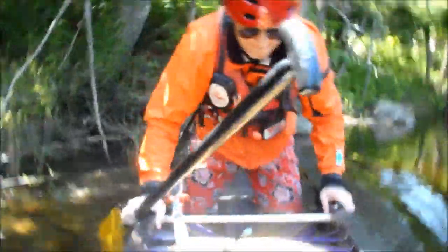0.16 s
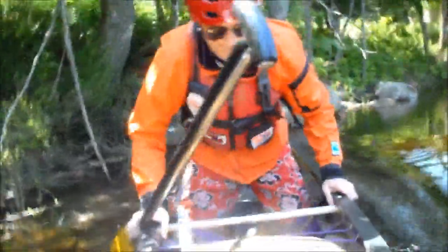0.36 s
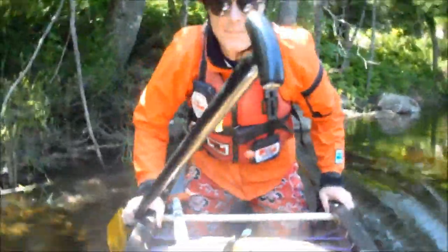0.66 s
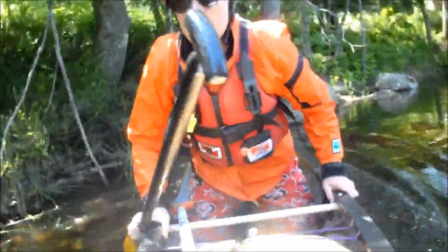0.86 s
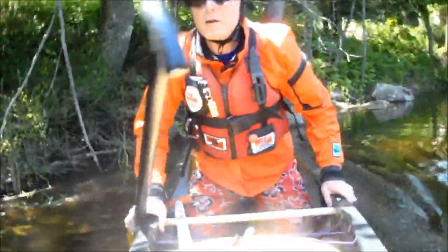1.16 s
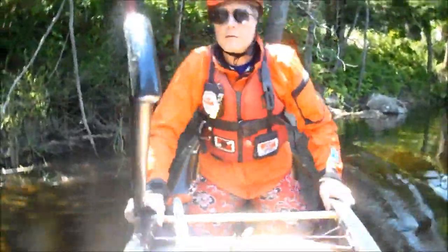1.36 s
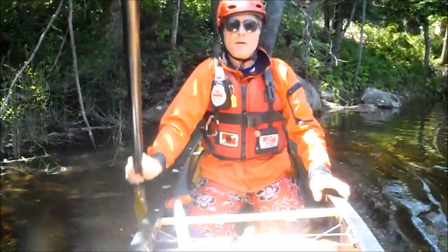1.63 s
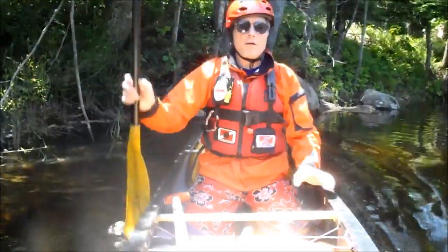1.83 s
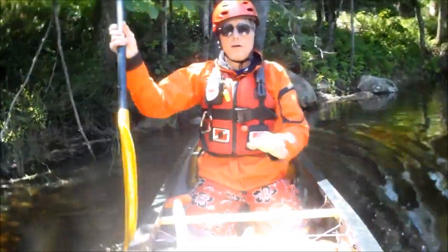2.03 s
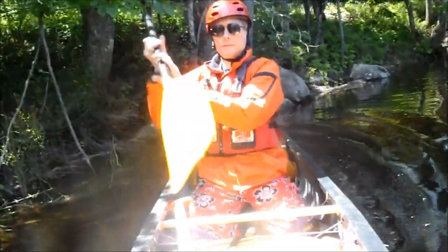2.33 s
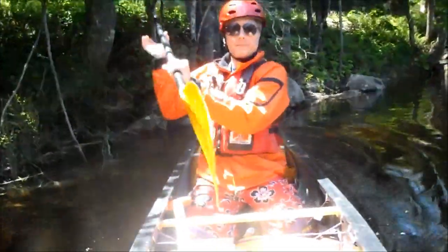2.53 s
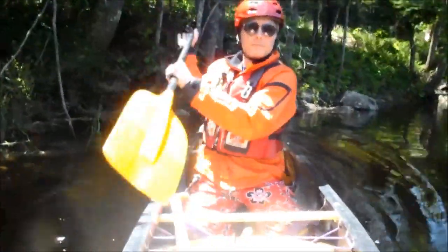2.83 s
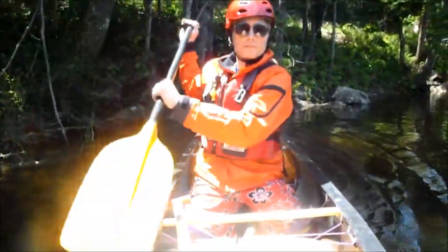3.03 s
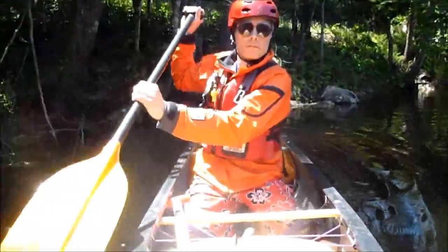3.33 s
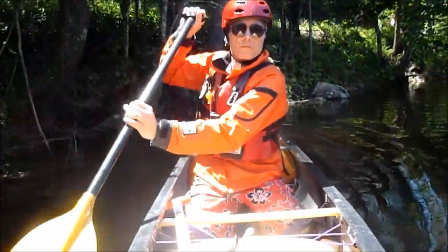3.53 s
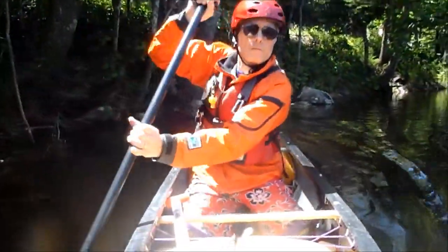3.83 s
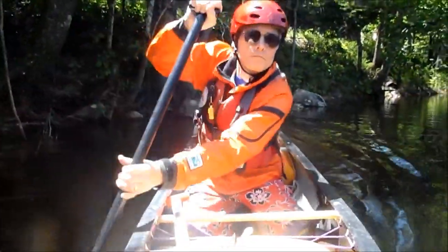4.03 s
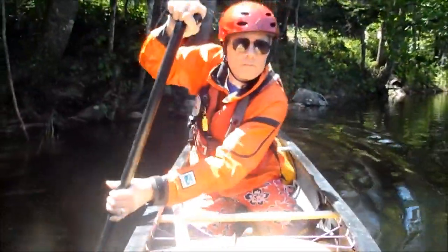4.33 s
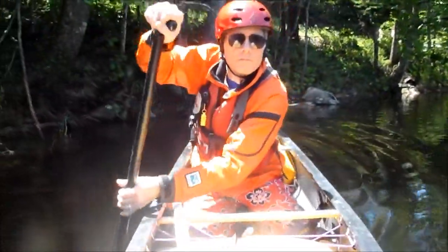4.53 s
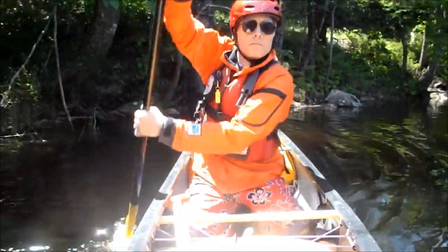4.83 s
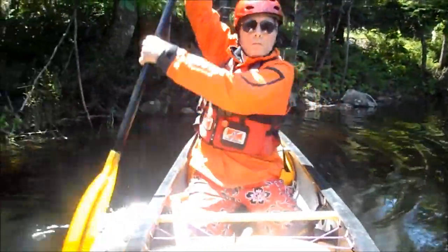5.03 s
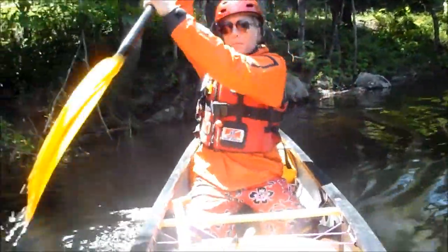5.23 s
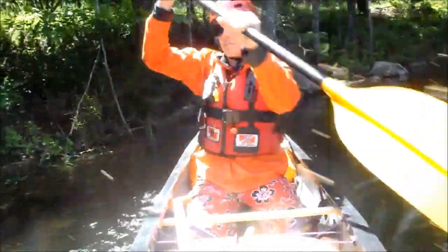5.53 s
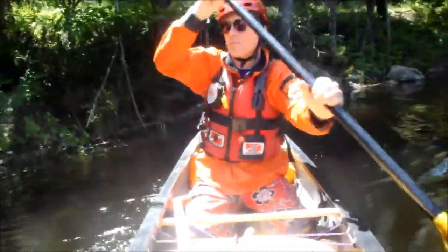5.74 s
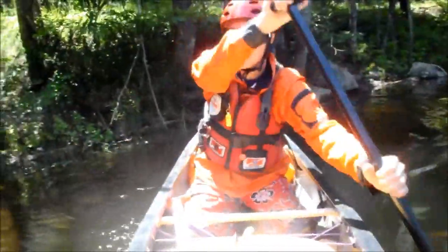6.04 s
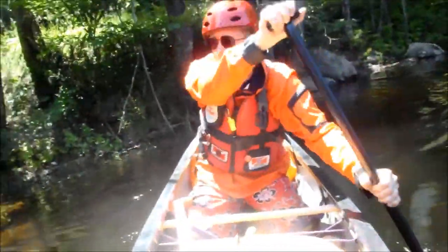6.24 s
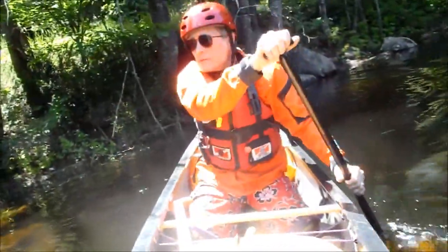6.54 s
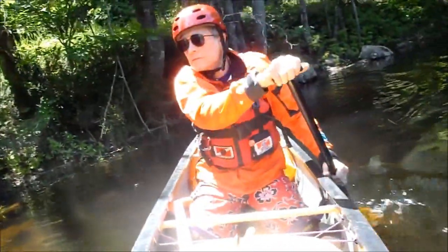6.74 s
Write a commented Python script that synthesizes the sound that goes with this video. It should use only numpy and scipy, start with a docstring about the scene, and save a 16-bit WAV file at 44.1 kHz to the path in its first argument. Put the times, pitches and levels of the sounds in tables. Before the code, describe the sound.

A boat leaves a stony bank outdoors: rough scraping and rumbling, clusters of hard hollow knocks, a sharp snap, then one strong thump at three seconds that makes the sound duck briefly. A thin bird repeats quick falling chirps nearby in time. Afterwards the hull is quieter, with dripping ticks, a swell of paddle wash, another knock, and plopping bubbles to the end. The onboard microphone sounds close, crisp and resonant in the treble over soft background hiss.

```python
"""Canoe leaving a gravel bank

A paddler pushes a canoe off a gravel bank, settles in and paddles on a calm wooded river.
Broadband forces excite damped hull modes as it grinds, knocks and rumbles; sharp snaps tick and ring.
Noise and random resonant grains make the water, rising sines the plops, gliding sines a three-note bird.
The nearby sounds pass a microphone port that rings near 5 kHz; coloured noise gives the air."""
import sys
import numpy as np
from scipy import signal
from scipy.fft import rfft, irfft
from scipy.io import wavfile
from scipy.ndimage import uniform_filter1d

SR = 44100
rng = np.random.default_rng(int(sys.argv[2]) if len(sys.argv) > 2 else 0)


def wrap_up_sound(samples):
    """Save the sound to the file named by the first command line argument, as 16-bit audio."""
    columns = np.atleast_2d(samples).T
    # keep every value between -1 and 1, then stretch to whole-number steps
    tamed = np.clip(columns, -1, 1)
    steps = np.round(tamed * 32767).astype(np.int16)
    wavfile.write(sys.argv[1], SR, steps)


N = 303849


def from_db(db):
    """Level to amplitude: 20 dB is a factor of ten."""
    return 10 ** (np.asarray(db) / 20)


def rms_one(x):
    """Normalisation to unit root-mean-square amplitude."""
    return x / np.sqrt(np.mean(x ** 2) + 1e-20)


def in_time(rows):
    """Linear interpolation of each column after the time column, one value per sample."""
    times, *columns = np.transpose(rows)
    return [np.interp(np.arange(N) / SR, times, column) for column in columns]


def band(x, low_hz, high_hz):
    """Band-pass filtering: a Butterworth response between two edges."""
    sos = signal.butter(2, [low_hz, high_hz], "band", fs=SR, output="sos")
    return signal.sosfilt(sos, x + 1e-18)


def drift(rate_hz):
    """Slow random modulation: noise through two equal low-pass poles, scaled to unit rms."""
    step = 40     # samples between the slow values
    r = np.exp(-2 * np.pi * rate_hz * step / SR)
    noise = rng.standard_normal(N // step + 2002)
    slow = signal.lfilter([1], [1, -2 * r, r * r], noise)[2000:]     # leave out the filter's start
    return np.interp(np.arange(N) / step, np.arange(len(slow)), rms_one(slow))


def ring(force, hz, t60):
    """Damped resonance: a unit click starts a decaying sine of initial height 1."""
    r, w = from_db(-60 / (t60 * SR)), 2 * np.pi * hz / SR
    return signal.lfilter([0, np.sin(w)], [1, -2 * r * np.cos(w), r * r], force + 1e-18)


def body(force, modes):
    """Modal superposition: all modes answer one force, with alternating sign."""
    return sum((-1) ** k * from_db(db) * ring(force, hz, t60) for k, (hz, db, t60) in enumerate(modes))


def add(out, s, sound):
    """Superposition: mix a sound in at time s."""
    i = round(s * SR)
    out[i:i + len(sound)] += sound[:N - i]


def burst(t60, lead, size=4000):
    """Impact force: a first sharp touch, then uneven micro-contacts that die away; energy near 1."""
    decay = from_db(-60 * np.arange(size) / SR / max(t60, 1e-3))
    grit = rng.standard_normal(size) * rng.exponential(1, size) * decay
    grit /= np.sqrt(np.sum(grit ** 2))
    grit[0] = lead
    return grit / np.sqrt(1 + lead ** 2)


def slide(length, size=4000):
    """Stick-slip friction: dense uneven slips under a swell; total energy 1."""
    part = np.clip(np.arange(size) / SR / max(length, 0.005), 0, 1)
    swell = np.sin(np.pi * part ** 0.26)
    grit = rng.standard_normal(size) * rng.exponential(1, size) * swell
    return grit / np.sqrt(np.sum(grit ** 2))


def grains(per_s, low_hz, high_hz, cycles, spread_db):
    """Poisson excitation: random clicks dealt to 14 resonators lasting a set number of cycles; rms 1."""
    sizes = from_db(spread_db * np.minimum(rng.exponential(1, N), 5)) * rng.choice([-1, 1], N)
    clicks = sizes * (rng.random(N) < per_s / SR)
    dealt = rng.integers(0, 14, N)
    pitches = np.geomspace(low_hz, high_hz, num=14)
    return rms_one(sum(ring(clicks * (dealt == k), hz, cycles / hz) for k, hz in enumerate(pitches)))


# spectrum of woods and microphone hiss: (frequency [Hz], relative spectral level [dB per Hz])
AIR_SPECTRUM = [(24, -31), (40, 1), (110, -3.5), (229, -7), (348, -5), (435, -0.5), (785, 1), (1220, -1),
                (3110, -11), (5220, -5.5), (7180, -17), (13300, -17.5), (14300, -5)]
AIR_DB, AIR_TOP_HZ = -44.5, 14220


def air():
    """Spectral shaping: steady coloured noise, slightly patchy in the bass, with a sharp upper edge."""
    hz = np.maximum(np.arange(N // 2 + 1) * SR / N, 1)
    spectrum_hz, spectrum_db = np.transpose(AIR_SPECTRUM)
    colour = from_db(np.interp(np.log(hz), np.log(spectrum_hz), spectrum_db)) * (hz < AIR_TOP_HZ)
    hiss = rms_one(irfft(rfft(rng.standard_normal(N)) * colour, N))
    bass_change = band(hiss, 40, 450) * (from_db(1.2 * drift(10)) - 1)
    return from_db(AIR_DB) * (hiss + bass_change)


# starts of the bird's phrase: (time [s], level [dB])
BIRD_PHRASES = [(2.56, -48), (2.875, -52), (3.192, -40), (3.492, -39), (3.82, -39), (4.15, -41)]
# notes of one phrase: (delay [s], length [s], first pitch [Hz], last pitch [Hz],
# level re phrase [dB], pitch spread [Hz])
BIRD_NOTES = [(-.015, .055, 5400, 4850, 0, 300), (.103, .038, 4400, 3700, 1, 150),
              (.163, .03, 3900, 3700, -2, 190)]


def bird():
    """Frequency modulation: falling whistles, roughened by a fast random waver in pitch."""
    out = np.zeros(N)
    for s, db in BIRD_PHRASES:
        for delay, length, first_hz, last_hz, note_db, spread_hz in BIRD_NOTES:
            part = np.linspace(0, 1, round(length * SR))
            waver = rms_one(uniform_filter1d(rng.standard_normal(3000), size=40))[:len(part)]
            hz = first_hz + (last_hz - first_hz) * part ** 2.48 + spread_hz * waver
            whistle = np.sin(2 * np.pi * np.cumsum(hz) / SR)
            add(out, s + delay, from_db(db + note_db) * np.sin(np.pi * part) * whistle)
    return out


# water at hull and blade, levels before the trims below:
# (time [s], gurgle level [dB], wash level [dB], droplet level [dB])
WATER_LEVELS = [(0.0, -35, -49, -64), (0.25, -43.5, -52, -67), (0.61, -38.5, -41, -56),
                (1.11, -39.5, -63, -80), (1.5, -46, -37.5, -53.5), (1.85, -55, -47, -64),
                (2.02, -33.5, -40, -53), (2.22, -52, -41, -52.5), (2.5, -47.5, -44.5, -69),
                (2.85, -45.5, -72, -56), (3.2, -39.5, -43, -69), (3.4, -57.5, -73, -75),
                (3.86, -49, -43, -58), (4.3, -62, -68, -52.5), (4.7, -49, -57, -51),
                (4.91, -37.5, -35, -44.5), (5.02, -46, -29.5, -40), (5.21, -40, -39, -43.5),
                (5.45, -67, -46, -58), (5.65, -48, -48, -60), (6.3, -49.5, -43, -56.5),
                (6.89, -41.5, -51, -58)]


def water():
    """Random bubble resonance gurgles along hull and blade, filtered noise hisses, droplets crackle."""
    gurgle_db, wash_db, droplets_db = in_time(WATER_LEVELS)
    fizz = grains(1500 * from_db(3 * drift(9.2)), 407, 2830, cycles=11.3, spread_db=3.5)
    gulps = grains(110 * from_db(5 * drift(6)), 200, 2400, cycles=24, spread_db=4)
    wash = band(rng.standard_normal(N), 1000, 9100) * from_db(3.5 * drift(14.0))
    droplets = grains(1100 * from_db(4 * drift(15)), 800, 4600, cycles=24, spread_db=2.8)
    gurgle = from_db(gurgle_db - 5.5) * (fizz + 0.49 * gulps)
    return gurgle + from_db(wash_db - 15.5) * wash + from_db(droplets_db) * droplets


# single bubbles: (time [s], level before decay [dB], starting pitch [Hz])
BUBBLES = [(3.892, -36, 2330), (4.03, -39, 1220), (4.089, -38, 2810), (4.637, -32, 2290),
           (4.794, -28.5, 630), (4.857, -33, 3830), (5.144, -28.5, 930), (5.174, -26, 804),
           (5.196, -24.5, 1130), (5.515, -26, 180), (5.546, -31, 1230), (5.633, -35.5, 1430),
           (5.718, -34, 1380), (5.776, -24.5, 1590), (6.183, -31, 1160), (6.396, -29.5, 726),
           (6.535, -31, 161), (6.585, -34, 1260), (6.594, -35.5, 277), (6.69, -27.5, 198),
           (6.745, -35, 1380), (6.798, -26.5, 1405), (6.811, -26.5, 1890), (6.843, -28, 1220),
           (6.879, -30, 1495)]
PLOP_T60_S = 0.048   # up to 1 kHz; smaller, higher bubbles die sooner


def plops():
    """Bubble resonance: a bubble rings and rises in pitch as it nears the surface."""
    out, t = np.zeros(N), np.arange(3000) / SR
    for s, db, hz in BUBBLES:
        t60 = PLOP_T60_S / np.sqrt(max(hz / 1000, 1))
        swell = np.minimum(t / 0.0012, 1) * from_db(db - 60 * t / t60)
        add(out, s, swell * np.sin(2 * np.pi * hz * (t + 1.5 * t * t)))
    return out


# sharp ticks of drops and of the shaft: (time [s], drive level [dB], body drive re tick, before trim [dB])
SHORT_TICKS = [(1.8876, -16, -20), (2.009, -11, -16), (3.737, 3, -19), (3.9963, -15, -18.5),
               (4.0774, -21.5, -11), (4.2213, -16, -29), (4.247, -14, -19), (4.295, -14, -14),
               (4.3807, -13, -39), (4.4403, -36, 7.5), (4.4964, -29.5, 1), (4.8533, -26.5, 2.5),
               (4.871, -25, -1), (4.955, -22, 0.5), (5.1413, -23.5, -3), (5.1829, -14.5, -8),
               (5.2747, -11.5, -19), (5.4, -7.5, -37), (5.4127, -10, -26), (5.4218, -4, -33),
               (5.7373, -12.5, -32), (5.754, -12.5, -25), (5.8152, -22, -2), (5.8262, -0.5, -17.5),
               (6.176, -8, -21), (6.189, -7, -20), (6.2288, -10, -16.5), (6.245, -11, -22),
               (6.266, -14.5, -14), (6.288, -14, -20), (6.3487, -15.5, -25), (6.5847, -25, -1.5),
               (6.874, -29, 3.5)]
# longer snaps: shaft clack, splashes, a rattling fitting:
# (time [s], drive level [dB], body drive re snap, before trim [dB], centre of the snap [Hz])
LONG_SNAPS = [(0.724, -11, -43, 3900), (1.6651, -18, -21.5, 5400), (1.8133, -2.5, -26.5, 3950),
              (2.3466, 5.5, -25, 5230), (2.3952, -16.5, -19, 5500), (2.4145, -13.5, -19, 5430),
              (3.8022, -6, -24.5, 5140), (4.268, -12, -29, 4200), (4.9417, -10.5, -19, 5000),
              (5.0743, -15.5, -31, 5240), (5.3135, -20, -35, 5030), (5.7739, -15.5, -19, 5000),
              (6.1633, -17, -20, 5040)]
# short mid-pitched ring of the longer snaps: (frequency [Hz], level [dB], decay time t60 [s])
SNAP_MODES = [(947, -6, .09), (1540, -5, .05), (1927, 0, .045), (2374, -5, .04)]
TICK_T60_S, SNAP_T60_S = 0.01, 0.042
TICK_HZ, SNAP_SPAN = 5000, 1.173   # centre of a tick's snap; its band reaches this ratio up and down
TOP_LOW_HZ, CUTOFF_HZ = 5900, 15170   # edges of the bright part; the upper one also ends the final output


def ticks_and_snaps():
    """Impact spectra: a snap over a duller body, brighter if harder; long ones add a short mid-pitched ring."""
    snap, top, thud, mid = np.zeros((4, N))
    hits = [(*row, TICK_HZ) for row in SHORT_TICKS] + LONG_SNAPS
    for k, (s, db, body_db, hz) in enumerate(hits):
        is_long = k >= len(SHORT_TICKS)
        force = from_db(7.5) * burst(SNAP_T60_S, lead=0.42) if is_long else burst(TICK_T60_S, lead=0.38)
        add(snap, s, from_db(db - 4.0) * band(force, hz / SNAP_SPAN, hz * SNAP_SPAN))
        add(top, s, from_db(1.58 * db - 7.5) * burst(0.0028, lead=0.66))
        add(thud, s, from_db(db + body_db + 22.5) * force)
        if is_long:
            add(mid, s, from_db(1.6 * db + body_db + 3) * burst(0.008, lead=1.5))
    return snap + band(top, TOP_LOW_HZ, CUTOFF_HZ) + band(thud, 450, 2410) + body(mid, SNAP_MODES)


# hull rumble: gravel grinding at first, then a low rumble and shudder afloat:
# (time [s], rumble level [dB], boom level [dB])
RUMBLE_LEVELS = [(0.0, -39.5, -31), (0.2, -47, -38), (0.32, -43, -42), (0.6, -43, -45.5),
                 (1.03, -45.5, -34), (1.52, -36.5, -43.5), (1.75, -46.5, -53), (2.08, -51, -50),
                 (2.4, -55, -67), (2.96, -54, -58), (3.03, -35.5, -33), (3.2, -52, -39), (3.45, -50, -72),
                 (3.8, -55, -55), (4.65, -50.5, -84), (5.2, -55.5, -54), (5.7, -52.5, -78), (6.0, -56, -54),
                 (6.89, -51.5, -56.5)]
# modes of the whole boat, the panels and the rail: (frequency [Hz], level [dB], decay time t60 [s])
BOOM_MODES = [(64, -4.5, 0.35), (86.8, -8.5, 0.61), (118.1, 1.5, 0.37), (173, -3, 0.15)]
PANEL_MODES = [(233, -12, 0.045), (345.4, 4.5, 0.091), (397, 2, 0.04), (482, 0, 0.049), (556, -8, 0.077)]
RAIL_MODES = [(590, -16, 0.035), (819, -5.5, 0.055), (937, -3.5, 0.024), (1138, 2.5, 0.015),
              (1291, -6, 0.044), (1430, -1.5, 0.016), (1732, -3, 0.013), (1990, -4.5, 0.013),
              (2320, 1, 0.006), (2920, -3.5, 0.0059)]


def hull_rumble():
    """Continuous random excitation: uneven noise drives the panels, rail and whole-boat boom."""
    force = rng.standard_normal(N) * from_db(5.4 * drift(20))
    rumble_db, boom_db = in_time(RUMBLE_LEVELS)
    rumble = rms_one(body(force, PANEL_MODES) + 2.0 * body(force, RAIL_MODES))
    boom = rms_one(body(force, BOOM_MODES))
    return from_db(rumble_db) * rumble + from_db(boom_db) * boom


# low thumps of the hull: (time [s], drive level [dB])
HULL_THUMPS = [(0.062, -29), (0.287, -31.5), (0.626, -33), (0.862, -30), (1.122, -30), (1.814, -32.5),
               (1.969, -30.5), (2.979, -26.5), (2.996, -27.5), (3.006, -18)]


def thumps():
    """Impulse response: one click per thump sets the whole boat booming."""
    clicks = np.zeros(N)
    for s, db in HULL_THUMPS:
        add(clicks, s, from_db([db]))
    return body(clicks, BOOM_MODES)


# blows on the hull, drives before the trims below: (time [s], rail drive [dB],
# panel drive re rail [dB], crack drive re rail [dB], favoured pitch [Hz])
HULL_BLOWS = [(0.137, -17, -2, 4, 1130), (0.269, -22, -4.5, -26, 1000), (0.288, -12, -0.5, -38, 840),
              (0.311, -11, -35, -7.5, 1270), (0.618, -6.5, -16.5, -26, 1190),
              (0.627, -10.5, -26, 0.5, 1050), (0.66, -9, -2, -3, 1520), (0.672, -16, -33, -4, 1170),
              (0.7, -25, -20, -9, 1160), (0.757, -21.5, 5.5, -20, 1380), (0.776, -14.5, -3.5, -6, 610),
              (0.784, -10.5, -21, -32, 1230), (0.861, -27, 4.5, -16.5, 950), (0.956, -9, -35, 0.5, 850),
              (0.99, -16.5, -15, 0, 2200), (1.006, -15.5, -13, 9, 1260), (1.146, -13, -16, -26, 1230),
              (1.327, -16.5, -13.5, 3, 815), (1.393, -19.5, -6, -3, 1230), (1.538, -25, -29, -23, 1150),
              (1.568, -22.5, -27, -17, 961), (1.596, -18, 1.5, -20, 1060), (1.971, -10, -5.5, 4, 790),
              (2.026, -27, -20, -24, 1000), (2.042, -16.5, -15, -24, 1190), (2.664, -27.5, -21, 6, 920),
              (2.772, -25, -18, 6.5, 856), (2.977, -2, -9.5, 4.5, 1260), (2.988, -12, -18, -35, 1320),
              (2.998, -11, -12, -14, 840), (3.006, -18.5, 0.5, -5, 840), (3.159, -22.5, -13.5, -14, 864),
              (3.205, -33, -12, -18, 870), (3.31, -25, -16, -15, 1190), (3.329, -23, -16, -18, 1050),
              (3.351, -22.5, -29, -13, 1030), (3.854, -25.5, -20, -8, 985), (5.453, -6, -8, -22, 845),
              (5.472, -13.5, -21, -1, 910), (5.512, -25.5, -12.5, -16, 1410),
              (5.982, -26.5, -16, 8.5, 1080)]
# slides of hull on stones, boots and paddle on hull: (time [s], rail drive [dB],
# panel drive re rail [dB], crack drive re rail [dB], favoured pitch [Hz], length [s])
HULL_SLIDES = [(0.033, -14.5, -3.5, 6.5, 1410, 0.023), (0.059, -16, 4.5, 6, 760, 0.035),
               (0.145, -16, -4, -14, 802, 0.019), (0.161, -7, -5.5, -10.5, 605, 0.024),
               (0.175, -13, -19, -8, 1000, 0.03), (0.452, -24, -18, 1, 1550, 0.086),
               (0.492, -22.5, -25, -7, 1300, 0.027), (1.007, -24.5, 2, 2.5, 1110, 0.055),
               (1.038, -35.5, 12, 0, 600, 0.035), (1.104, -23.5, 3, 6, 1040, 0.022),
               (1.124, -22.5, -4, -5, 1190, 0.036), (1.364, -23, -2.5, -4, 1220, 0.035),
               (1.812, -17.5, -2.5, 5.5, 780, 0.037), (3.743, -25.5, -8, 2, 780, 0.051)]
KNOCK_T60_S = 0.005   # decay of a blow's bright edge; its duller forces last 3 or 5 times as long


def knocks_and_scrapes():
    """Modal excitation by place: contacts ring nearby rail modes and panels, with a noisy crack on top."""
    panel, crack, top = np.zeros((3, N))
    rail, rail_hz = np.zeros((len(RAIL_MODES), N)), np.array(RAIL_MODES)[:, 0]
    contacts = [(*row, KNOCK_T60_S) for row in HULL_BLOWS] + HULL_SLIDES
    for k, (s, db, panel_db, crack_db, hz, length) in enumerate(contacts):
        if k < len(HULL_BLOWS):
            rail_force = burst(3 * length, lead=1.6)
            panel_force = burst(3 * length, lead=0.63)
            crack_force = burst(5 * length, lead=0.16)
        else:
            rail_force = from_db(3) * slide(length)
            panel_force = slide(length)
            crack_force = from_db(12.5) * slide(length)
        near_db = -np.minimum(9 * np.log2(rail_hz / hz) ** 2, 11)     # the spot struck favours nearby modes
        for track, mode_db in zip(rail, near_db):
            add(track, s, from_db(db + mode_db - 3.0) * rail_force)
        add(panel, s, from_db(db + panel_db - 2.5) * panel_force)
        add(crack, s, from_db(db + crack_db - 3.5) * crack_force)
        # hard hits are brighter
        add(top, s, from_db(1.8 * (db + crack_db) + 1) * burst(length, lead=0.31))
    rails = sum((-1) ** k * body(track, [mode]) for k, (track, mode) in enumerate(zip(rail, RAIL_MODES)))
    return rails + body(panel, PANEL_MODES) + band(crack, 1330, 6020) + band(top, 9800, 16000)


PORT_HZ, PORT_WIDTH_HZ, PORT_DB = 5186, 875, 21.5


def port(x):
    """Cavity resonance: the cavity in front of the microphone lifts one band."""
    r, w = np.exp(-np.pi * PORT_WIDTH_HZ / SR), 2 * np.pi * PORT_HZ / SR
    peak = signal.lfilter(np.array([1, 0, -1]) * (1 - r * r) / 2, [1, -2 * r * np.cos(w), r * r], x)
    return x + (from_db(PORT_DB) - 1) * peak


def scene():
    """Linear superposition: near sounds pass the port; bird and air are added as they arrive."""
    hull = hull_rumble() + thumps() + knocks_and_scrapes()
    near = water() + plops() + ticks_and_snaps() + hull
    return (air() + bird() + port(near))[None]


# the level dips briefly: (time [s], level [dB])
LEVEL_DIP = [(3.008, 0), (3.016, -10.5), (3.16, -10.5), (3.17, -5), (3.33, 0)]


def record(dry):
    """Band limiting and saturation: a bass cut, the dip in level, rounded peaks, a steep top cut."""
    level = band(dry, 27, 21000) * from_db(in_time(LEVEL_DIP)[0])
    rounded = 0.97 * np.tanh(level / 0.97)
    return signal.sosfilt(signal.cheby2(12, 70, CUTOFF_HZ, fs=SR, output="sos"), rounded)


dry = scene()
out = record(dry)
wrap_up_sound(out)
```